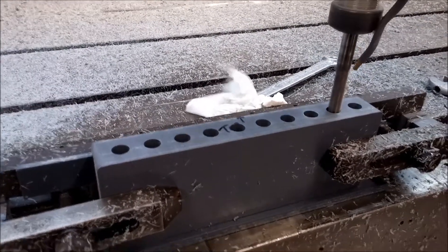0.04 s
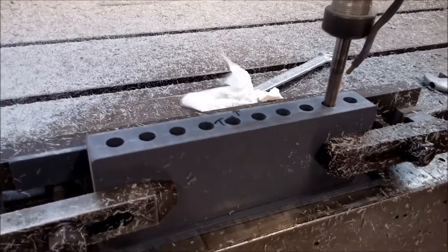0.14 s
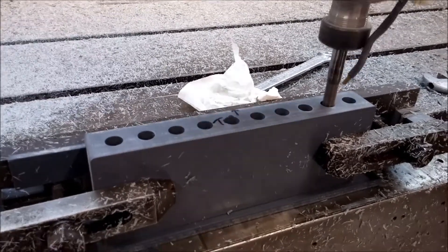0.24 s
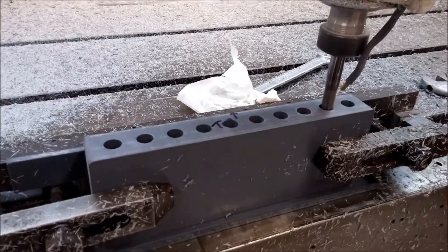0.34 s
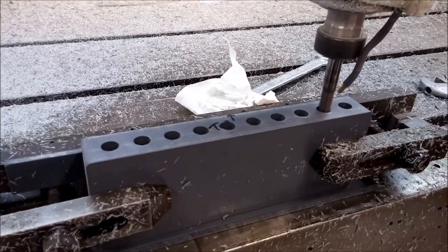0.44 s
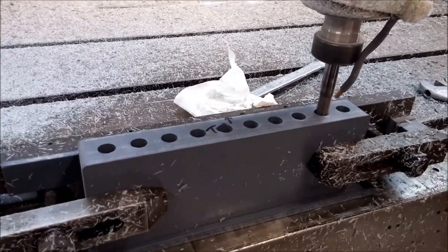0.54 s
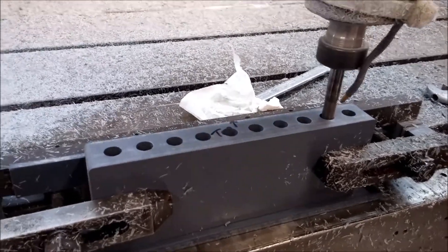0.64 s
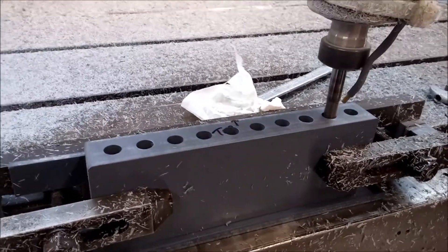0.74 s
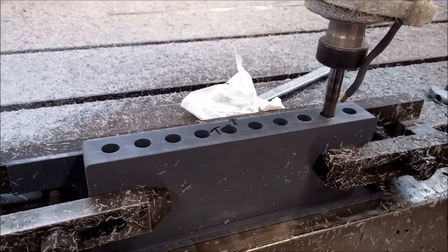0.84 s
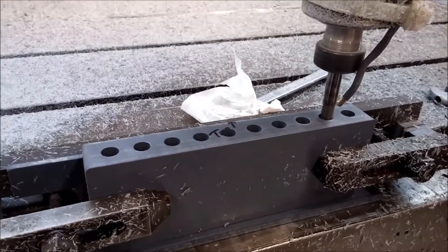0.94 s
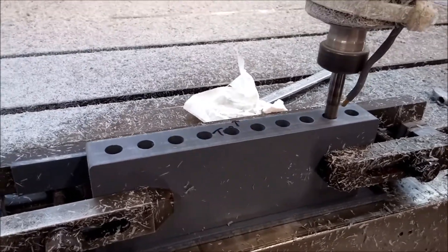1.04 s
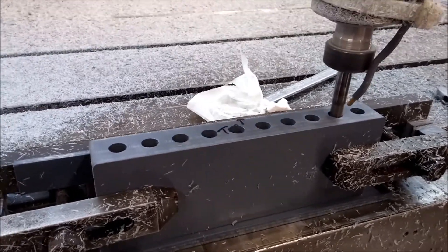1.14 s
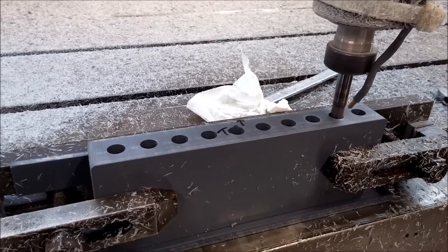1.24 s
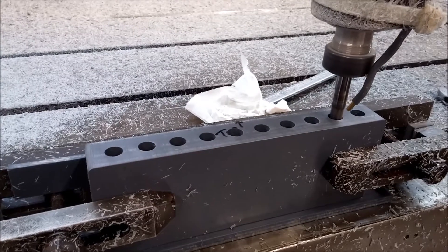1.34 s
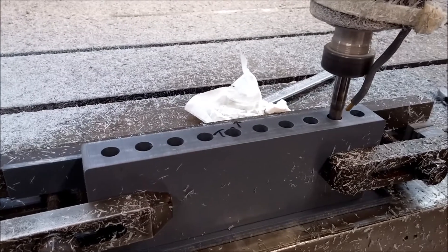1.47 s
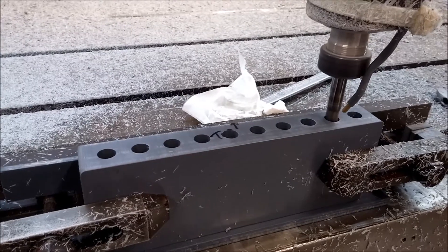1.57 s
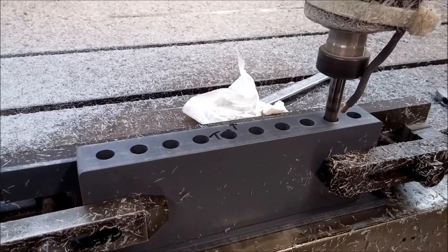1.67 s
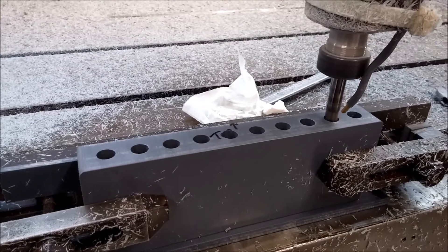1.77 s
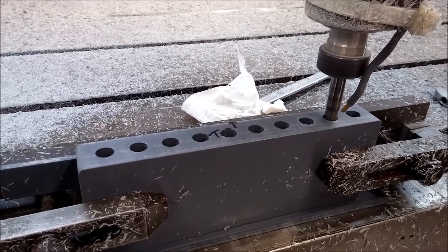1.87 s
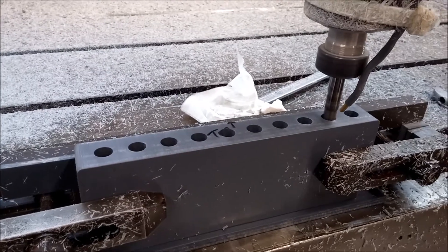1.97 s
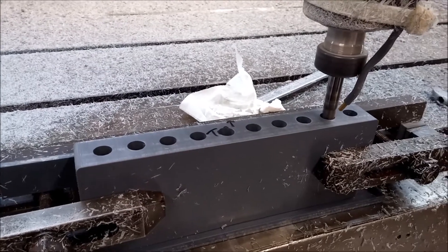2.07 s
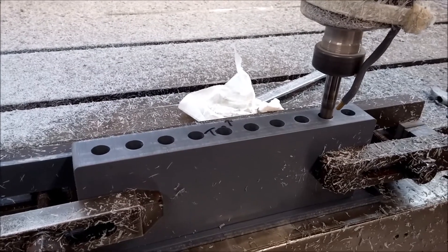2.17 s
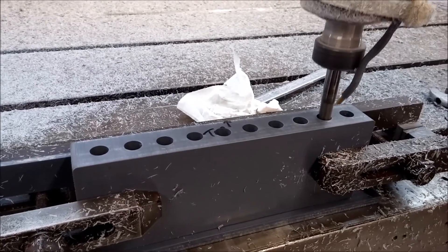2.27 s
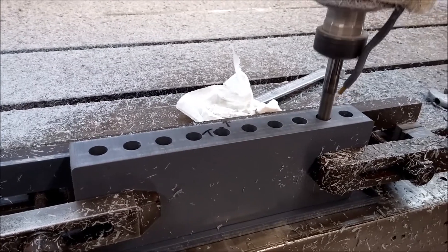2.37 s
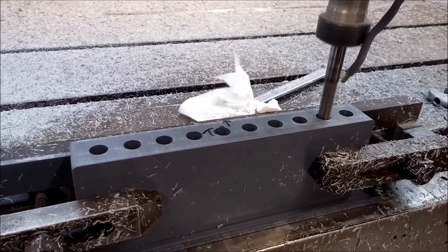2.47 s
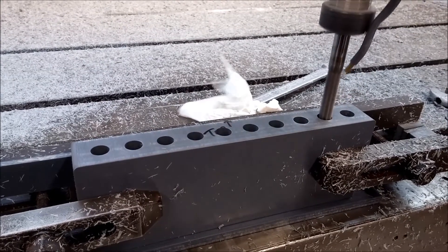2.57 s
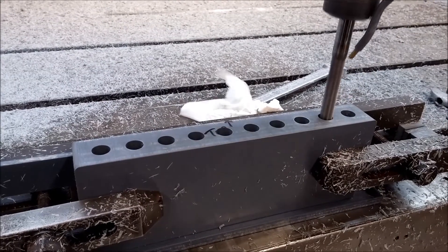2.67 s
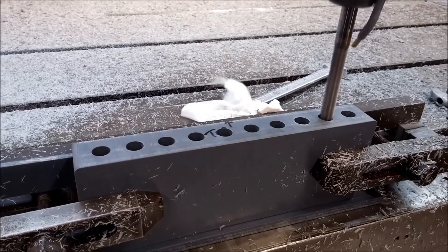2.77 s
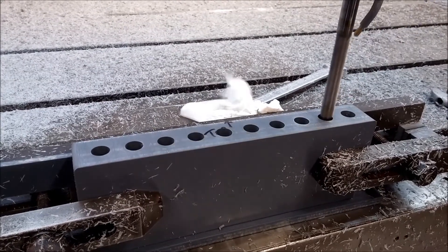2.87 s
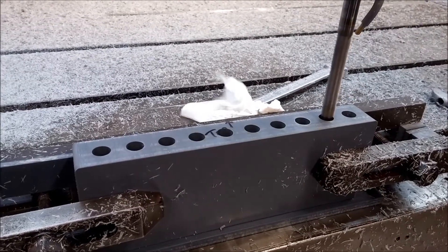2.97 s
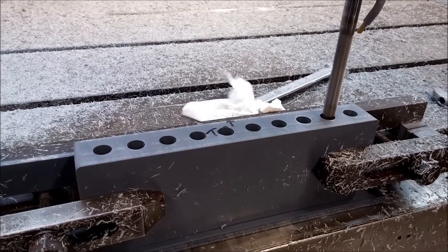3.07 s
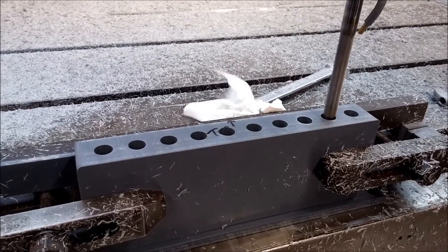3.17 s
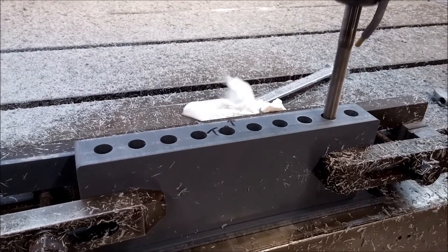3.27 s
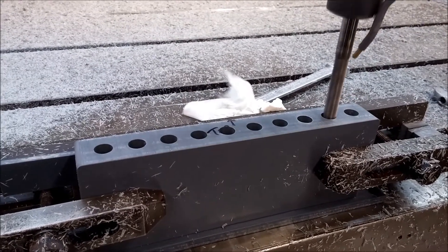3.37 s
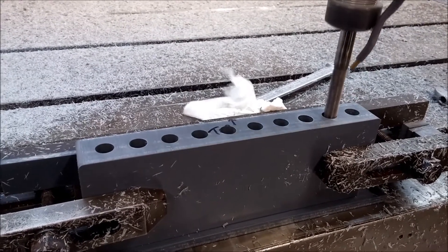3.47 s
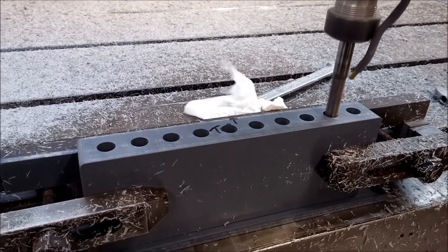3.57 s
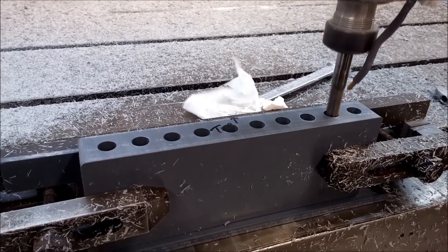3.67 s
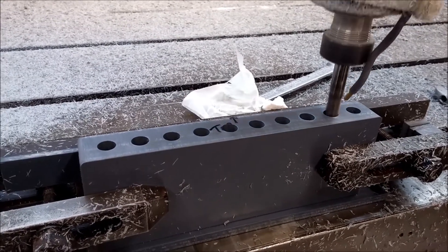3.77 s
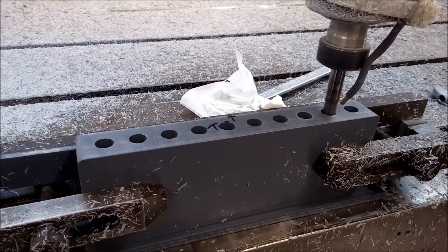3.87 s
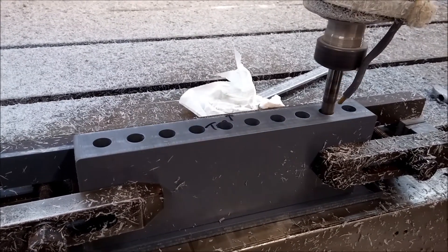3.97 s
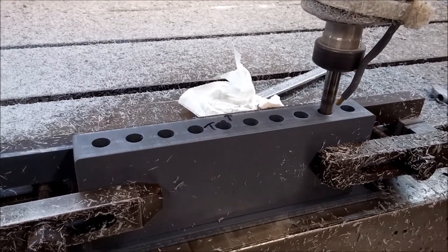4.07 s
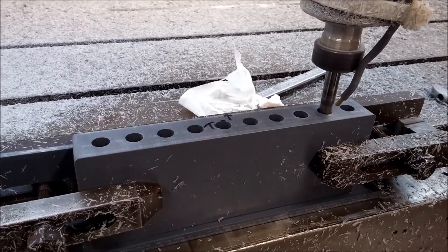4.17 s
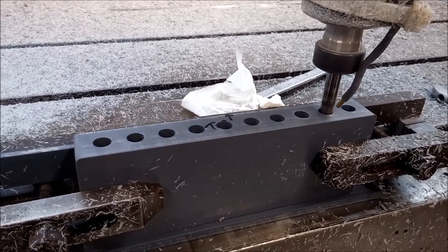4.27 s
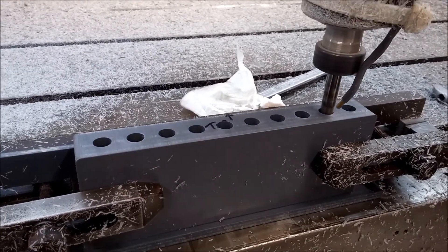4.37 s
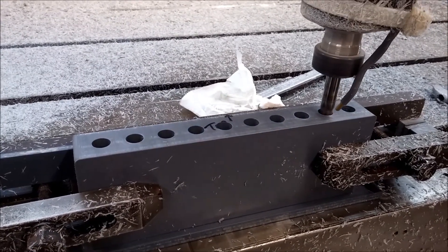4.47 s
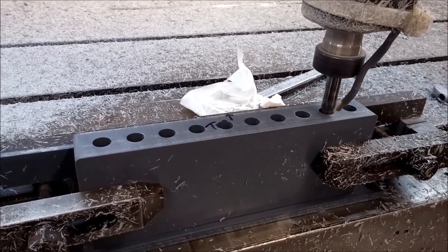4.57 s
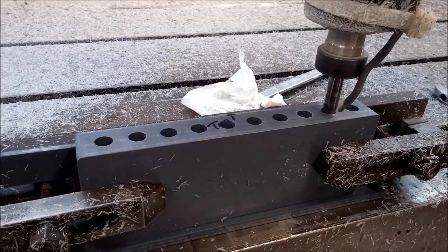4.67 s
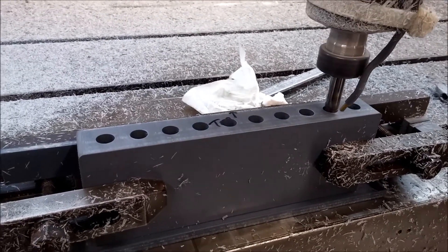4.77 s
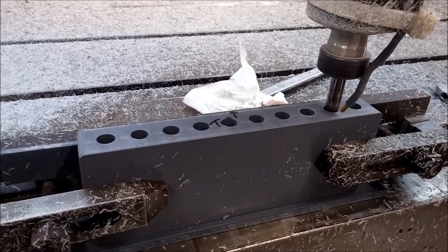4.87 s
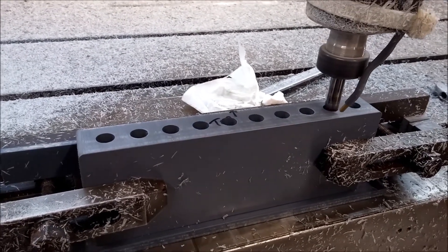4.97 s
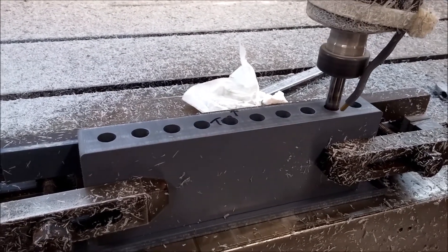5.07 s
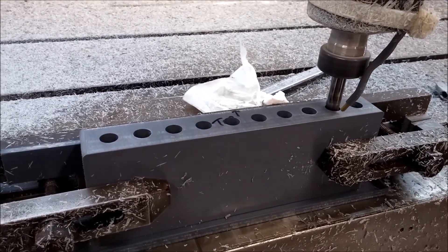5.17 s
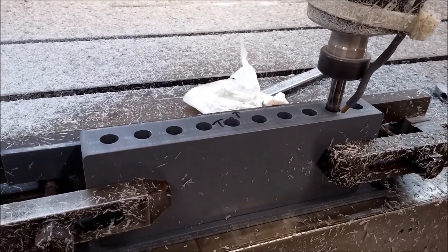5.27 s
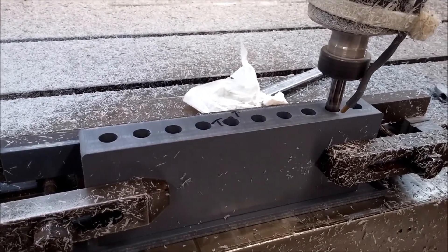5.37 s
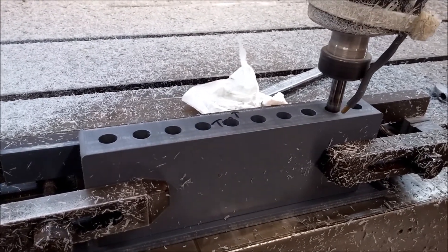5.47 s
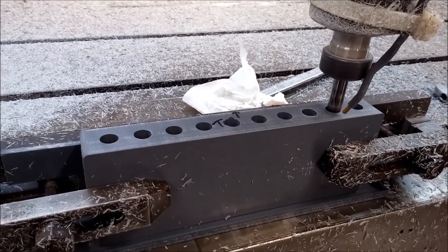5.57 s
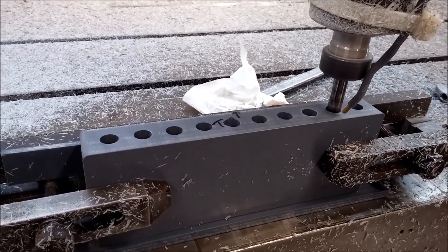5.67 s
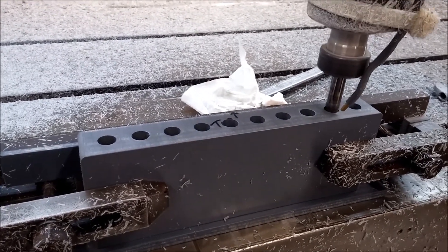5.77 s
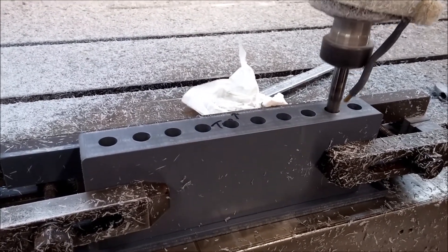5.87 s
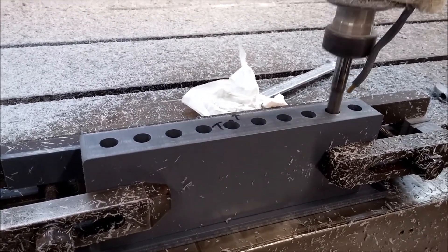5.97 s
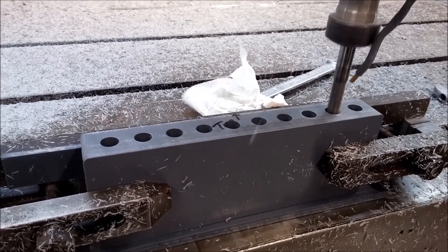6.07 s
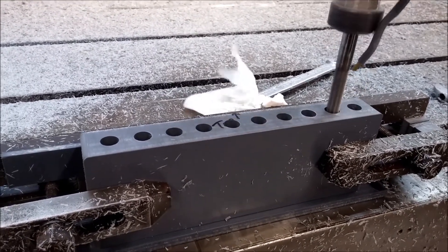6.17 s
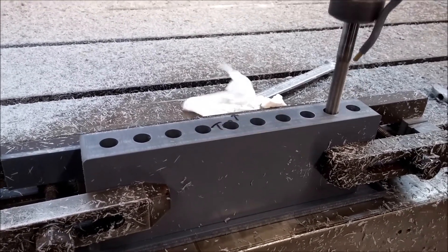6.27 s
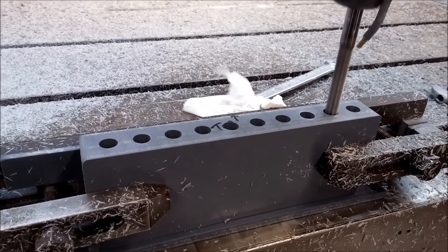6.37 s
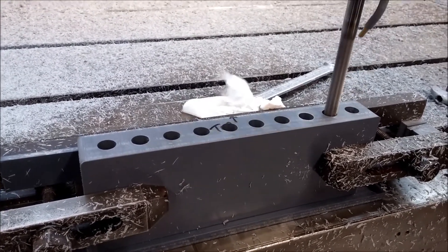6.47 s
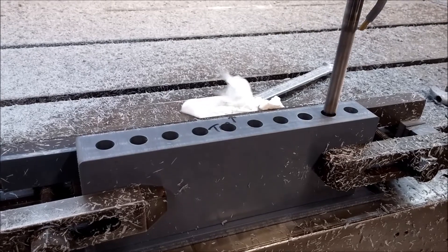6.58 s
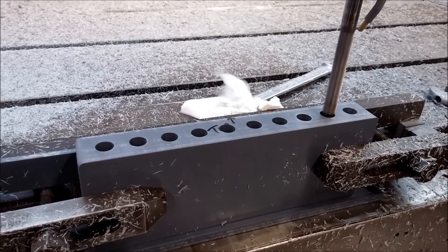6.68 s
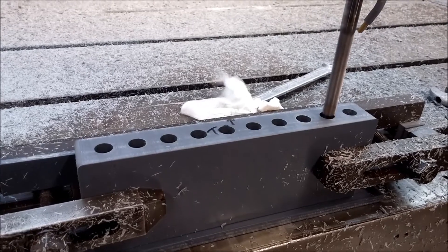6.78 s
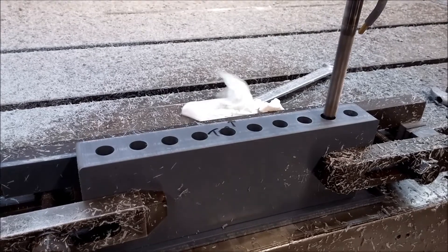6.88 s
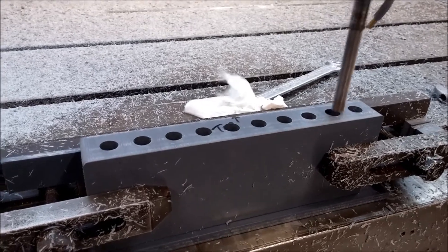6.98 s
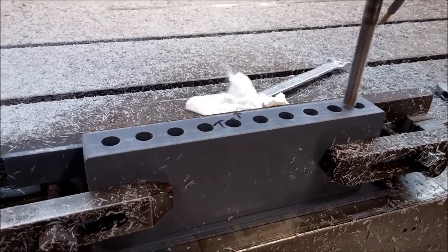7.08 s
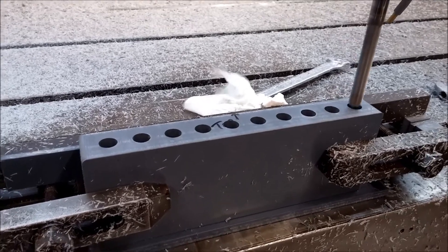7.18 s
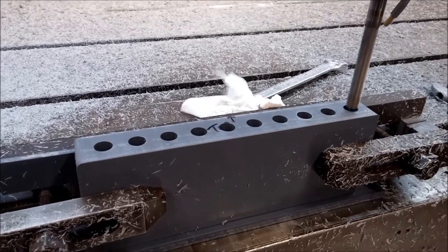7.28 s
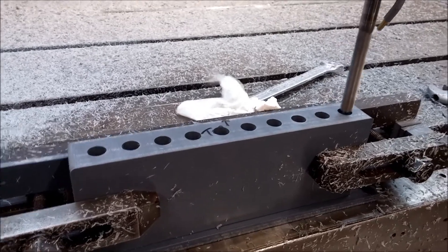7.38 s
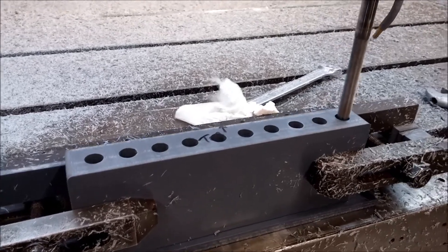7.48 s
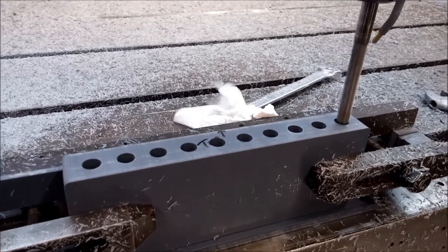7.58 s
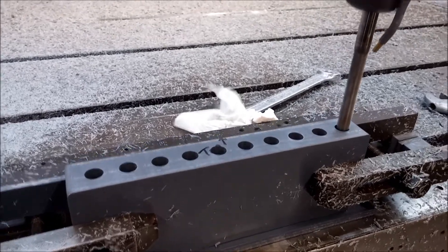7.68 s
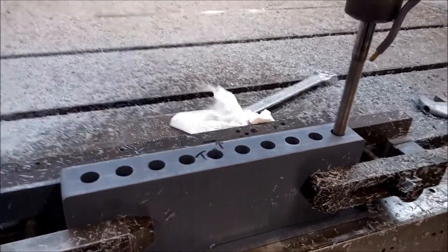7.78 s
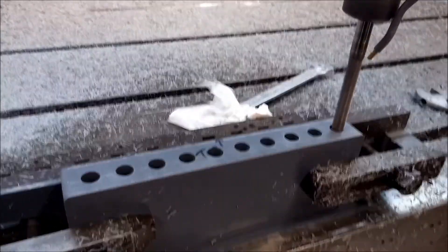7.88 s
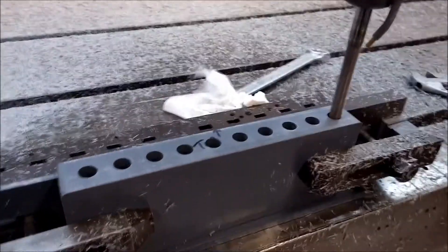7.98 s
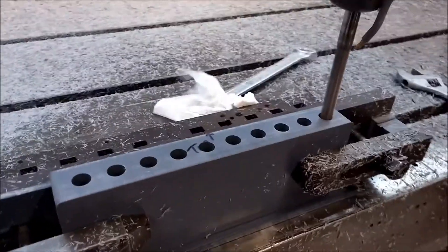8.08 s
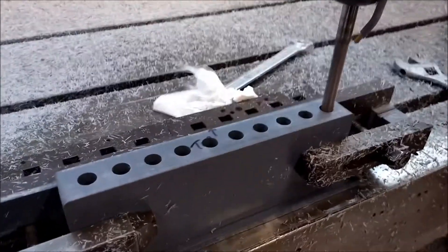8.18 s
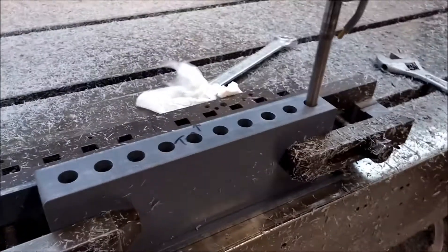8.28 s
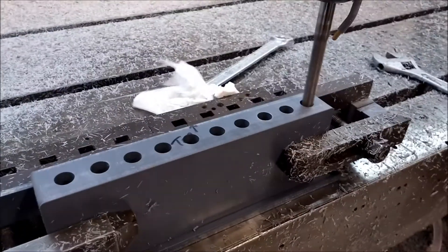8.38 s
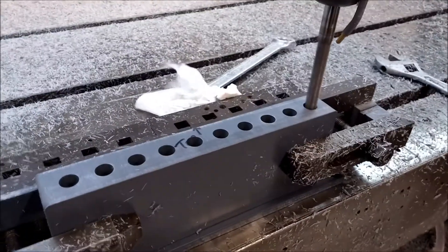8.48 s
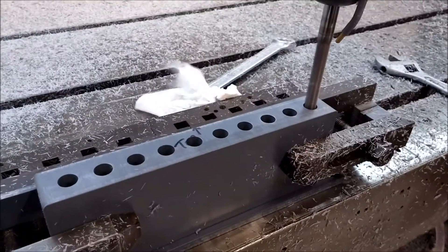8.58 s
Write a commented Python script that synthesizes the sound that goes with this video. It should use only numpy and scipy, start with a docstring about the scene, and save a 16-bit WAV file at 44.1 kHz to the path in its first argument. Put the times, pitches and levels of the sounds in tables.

```python
"""A loud hiss of air and coolant mist, joined by a whistle, as a mill drills a plastic block in pecks.
The hiss is turbulence where the jet strikes the drill and the rim of the deep hole. The jet also blows
the hole as a stopped pipe, whose note is now breathy, now clean. Drops and chips spit out in short
pressure pulses as the drill goes in. The spindle hums underneath, all heard close up in a workshop."""
import sys
import numpy as np
from scipy import signal
from scipy.fft import rfft, irfft, next_fast_len
from scipy.io import wavfile

SR = 44100
rng = np.random.default_rng(int(sys.argv[2]) if len(sys.argv) > 2 else 0)


def unload_wav(signal):
    """Save mono or channel-first audio to the path in sys.argv[1] as 16-bit WAV at rate SR, clipped to [-1, 1]."""
    wavfile.write(
        sys.argv[1],
        SR,
        np.round(np.clip(np.atleast_2d(signal).T, -1, 1) * 32767).astype(np.int16),
    )


N = 380123
TIME = np.arange(N) / SR
FREQS = np.maximum(np.arange(N // 2 + 1) * SR / N, 1)

# Jet spectra with the drill down and up: f/Hz, relative level/dB
DOWN_SPECTRUM = [(40, -42), (100, -27), (220, -0.5), (500, 3), (1400, 5.5), (1950, 8), (2700, 1), (4300, 3),
                 (6500, 5.5), (8000, 4), (10500, 6), (12000, -8.5), (16000, -15)]
UP_SPECTRUM = [(40, -41), (100, -42), (300, -9), (720, -2.5), (1000, 5), (1300, 0), (2000, 2.5),
               (2900, 4.5), (4800, 3), (7000, 4), (8600, 5), (11000, 0.5), (12300, -5.5), (13600, -30),
               (16000, -23)]
# Resonances and dips round the chuck (drill down) and in the tool gap (up): f/Hz, width/Hz, gain/dB
CHUCK_RESONANCES = [(1640, 200, 1.5), (2760, 91, 4.5), (4540, 200, 0.5), (5800, 170, -2.5),
                    (6600, 210, 0.5), (8000, 200, 3.5), (7800, 300, -2), (8330, 150, 3.5)]
GAP_RESONANCES = [(1128, 174, 7), (1550, 125, 9), (1727, 160, 6.5), (2040, 86, 5.5), (2285, 56, 6),
                  (2970, 130, -1.5), (3270, 37, 9.5), (3280, 90, -3), (3620, 70, -2), (3740, 70, 3.5),
                  (3850, 70, -2), (4400, 61, 3), (4970, 70, -3), (4930, 80, 2), (5390, 290, 4.5),
                  (6040, 140, -1), (6530, 140, 6), (7400, 370, 8), (7600, 250, -2), (8480, 300, 4),
                  (8800, 250, -1), (9840, 300, -2), (10770, 500, 5.5)]
# Low shelf of the free jet, changing as the microphone moves about: t/s, gain/dB
JET_BODY = [(0, -0.5), (3.3, 0.5), (6.8, -2), (7.15, 3.5), (7.5, 4), (7.8, 3), (8.1, -0.5), (8.4, -3),
            (8.62, -12)]

def jet(jet_db, lift, free_lift=0.88, shelf_hz=1500):
    """Turbulent noise, coloured by cavity resonances that change as the drill lifts out of the hole."""
    clear = np.clip(lift / free_lift, 0, 1)
    body_db, = in_time(JET_BODY)
    down = from_db(jet_db + 3) * np.sqrt(1 - clear) * hiss(DOWN_SPECTRUM, CHUCK_RESONANCES)
    free = hiss(UP_SPECTRUM, GAP_RESONANCES)
    free += (from_db(body_db) - 1) * filtered(free, shelf_hz, "low", order=1)
    up = from_db(jet_db + 5.5) * np.sqrt(clear) * free
    return (down + up) * from_db(0.67 * drift(21))


# Spectrum of the rim hiss: f/Hz, relative level/dB
RIM_SPECTRUM = [(1000, -41), (4000, -17), (6000, -12), (8000, 5), (10200, 8), (11600, 4), (12700, 6),
                (13600, 6.5), (14500, 4), (15200, 16), (15700, 7), (16000, 6.5)]
# Treble that stays in the jet away from the rim: t/s, relative level/dB
JET_TREBLE = [(0, -15), (3.5, -16), (5.3, -18), (6.1, -14), (7.0, -9), (7.6, -7), (8.62, -12)]

def rim_hiss(jet_db, lift, rim_lift=0.4, rim_reach=0.26):
    """Edge noise and atomisation: the jet hisses brightly as it grazes the rim or tears up coolant."""
    treble_db, = in_time(JET_TREBLE)
    grazing = from_db(jet_db + 7) * bell(lift - rim_lift, rim_reach)
    treble = from_db(jet_db + treble_db + 4.5)
    spray = from_db(2.6) * sputter(release_s=0.24)
    gain = np.sqrt(grazing ** 2 + treble ** 2 + spray ** 2)
    return gain * from_db(0.57 * drift(25)) * hiss(RIM_SPECTRUM)


# Fundamental of the hole, sharper the harder it is blown: t/s, f/Hz
FUNDAMENTAL = [(0, 1785), (.55, 1834), (1.45, 1822), (1.8, 1802), (2.5, 1804), (2.75, 1822), (3.0, 1793),
               (3.25, 1765), (3.7, 1775), (4.0, 1822), (4.2, 1810), (4.5, 1818), (4.8, 1826), (5.45, 1840),
               (6.0, 1840), (6.45, 1818), (6.95, 1772), (8.62, 1790)]
# Harmonics of the clean tone: harmonic number, level/dB re the fundamental
HARMONICS = [(2, -33), (3, -16)]
# Blasts in which the whistle catches: start t/s, end t/s, final level/dB, growth/(dB/s)
WHISTLE_BLASTS = [(4.724, 5.165, -23.5, 5), (5.204, 5.264, -18, 42), (5.427, 5.482, -26.5, -28),
                  (5.607, 5.782, -13, 47), (5.963, 5.988, -24, -2), (6.174, 6.277, -20.5, -15),
                  (6.52, 6.726, -25, 14)]
# Spells in which a lower tone beats with the note: centre t/s, length/s, beat f/Hz, amplitude ratio
BEAT_SPELLS = [(1.953, .45, 29, 0.33), (4.864, 0.33, 39, .85), (5.099, 0.24, 15.7, .6),
               (6.218, .18, 26.7, 0.77), (6.681, 0.2, 31, .4)]

def whistle(lift, clean_hz=1797.5, clean_range_hz=7.1, blast_flat_hz=9.2, breath_flat_hz=12):
    """Stopped-pipe resonance: blown harder, the fundamental grows sharper, louder and cleaner."""
    hz, = in_time(FUNDAMENTAL)
    share = mouth_share(lift)
    clean = 0.899 * share / (1 + np.exp((clean_hz - hz) / clean_range_hz))
    stall = held(5.28, 6.11, 0.014, 0.014)   # at the bottom of the hole the note sinks and flutters
    flutter_db = 0.5 * (1 + stall) * np.clip(drift(25), -2, 1.5)
    blowing_db = -24.5 + 0.06 * (hz - 1833)
    steady = from_db(blowing_db - 5.5 * (1 - share) - 11 * stall + flutter_db)
    blasts = 0
    for start, end, db, growth in WHISTLE_BLASTS:
        swell_db = db + growth * (np.clip(TIME, start, end) - end)
        blasts += from_db(swell_db) * held(start, end, attack_s=0.011, release_s=0.012)
    wander_hz = 8 * (1.2 - clean) * drift(18.15)
    phase = phase_of(hz - blast_flat_hz * blasts / blasts.max() + wander_hz)
    lower = sum(ratio * bell(TIME - s, length) * np.exp(-2j * np.pi * beat_hz * (TIME - s))
                for s, length, beat_hz, ratio in BEAT_SPELLS)
    tone = np.imag((1 + lower) * np.exp(1j * phase)) * np.sqrt(2 / (1 + np.abs(lower) ** 2))
    tone += sum(from_db(db) * np.sqrt(2) * np.sin(k * phase) for k, db in HARMONICS)
    breath = resonance(phase - 2 * np.pi * breath_flat_hz * TIME, width_hz=38)
    return np.hypot(steady * np.sqrt(clean), blasts) * tone + steady * np.sqrt(1 - clean) * breath


# Second mode of the stopped pipe: t/s, f/Hz, relative level/dB
SECOND_MODE = [(0, 5390, -7), (.5, 5400, -8), (1.1, 5272, -7), (1.5, 5410, -10), (2.4, 5530, -6.5),
               (4.4, 5460, -8.5), (5.3, 5525, -2.5), (6.1, 5520, -3), (6.4, 5490, -6), (8.62, 5450, -39)]
# Its other upper resonances: ratio to the fundamental, width/Hz, relative level/dB
PIPE_MODES = [(2.003, 50, -24), (4.93, 260, -5.5), (5.09, 312, -4.5), (5.27, 300, -7), (5.47, 550, -11),
              (7.07, 350, -20)]

def upper_modes(jet_db, lift):
    """Forced resonance: turbulence at the mouth drives the hole's broad upper modes, mostly odd ones."""
    hz, = in_time(FUNDAMENTAL)
    second_hz, second_db = in_time(SECOND_MODE)
    second = from_db(second_db) * resonance(phase_of(second_hz), width_hz=240)
    others = sum(from_db(db) * resonance(phase_of(k * hz), width) for k, width, db in PIPE_MODES)
    return from_db(jet_db + 4.5) * mouth_share(lift) * (second + others)


def mouth_share(lift, miss_lift=0.86, miss_range=0.061):
    """Jet-pipe coupling: the share of the jet that meets the mouth falls as the nozzle rises."""
    return 1 / (1 + np.exp((lift - miss_lift) / miss_range))


# Edge tones: f/Hz, fall per unit lift/Hz, width/Hz, reach in lift, level/dB re the jet
RIM_TONES = [(9400, 7200, 420, 0.24, 5.5), (6170, 300, 1060, 0.15, 2.5)]

def edge_tones(jet_db, lift, loudest_lift=0.38):
    """A jet oscillates against an edge: the pitch rises as the nozzle nears the rim, falls as it leaves."""
    past = lift - loudest_lift
    return sum(from_db(jet_db + db) * bell(past, reach) * resonance(phase_of(hz - fall * past), width)
               for hz, fall, width, reach, db in RIM_TONES)


# Passing squeals: centre t/s, length/s, f/Hz, width/Hz, level/dB
SQUEAL_BANDS = [(.84, 0.49, 5240, 70, -24.5), (1.05, .71, 4400, 200, -32.5), (1.077, 0.65, 13550, 350, -27),
                (6.504, 0.063, 6260, 90.5, -22), (6.57, 0.045, 5630, 50, -23)]

def squeals():
    """Narrow-band noise is heard as tones of steady pitch that swell and fade."""
    return sum(from_db(db) * bell(TIME - s, length) * resonance(phase_of(hz), width)
               for s, length, hz, width, db in SQUEAL_BANDS)


# The loudest spits: t/s, relative level/dB
LOUD_SPITS = [(0.59, -2), (.637, -4), (0.6564, -2), (0.6753, 4), (0.7128, -2), (.8127, -1), (0.8276, 0.5),
              (0.8365, -2), (0.9353, -6), (1.0228, -2), (1.0873, 3), (1.1376, -3), (1.206, -6), (1.2743, 2),
              (1.3856, 0.5), (1.514, 1), (1.542, 1.5), (1.6619, 4), (1.6792, 2.5), (1.9087, -4),
              (2.5698, 3), (2.6443, 1), (2.6768, 0), (4.0597, -3), (4.1276, -4), (4.1428, -1), (4.1869, 0),
              (4.2922, -5), (4.3816, 0), (4.411, 1), (4.42, -5), (4.6406, -4.5), (6.2444, -1.5),
              (6.3039, 0), (6.3372, 0)]

def spits(jet_db, drops_per_s=470, spread_db=3, collapse_hz=650):
    """Impulsive sources: each bursting drop is a pressure step that collapses within a millisecond."""
    wet = np.hypot(sputter(release_s=0.13), from_db(jet_db - 24))   # a few drops always fly
    sizes = from_db(spread_db * np.minimum(rng.exponential(1, N), 3.3)) * rng.choice([-1, 1], N)
    small = sizes * (rng.random(N) < drops_per_s / SR)
    large = np.zeros(N)
    for s, db in LOUD_SPITS:
        large[int(s * SR)] = rng.choice([-1, 1]) * from_db(db)
    decay = np.exp(-2 * np.pi * collapse_hz / SR)
    steps = signal.lfilter([1], [1, -decay], np.array([small, large]) + 1e-18)
    rounded = filtered(steps, 2900, "low", order=1)   # a drop takes a moment to burst
    small, large = filtered(rounded, 140, "high", order=2)   # a small source radiates little bass
    drops = from_db(1.5) * wet * rms_one(small) + from_db(0.8) * large
    return filtered(drops, 86, "high", order=2)


# Spells of sputtering coolant: start t/s, end t/s, relative level/dB
SPUTTER_SPELLS = [(0.576, 1.46, -26), (1.586, 1.696, -28.5), (1.877, 2.052, -30.5), (2.55, 2.74, -29),
                  (4.026, 4.461, -26.5), (6.287, 6.35, -25.5), (6.47, 6.5, -27)]

def sputter(release_s, attack_s=0.062):
    """Envelope of the coolant thrown from the hole, with exponential rise and decay."""
    spells = [from_db(db) * held(start, end, attack_s, release_s) for start, end, db in SPUTTER_SPELLS]
    return np.max(spells, axis=0)


def gust(at_s=6.42, length_s=0.13, db=-42):
    """Flow noise: a stray gust brushes the microphone as the drill comes out."""
    return from_db(db) * bell(TIME - at_s, length_s) * drift(70)


# Partials of the spindle: f/Hz, level/dB
SPINDLE_PARTIALS = [(208, -64.5), (417, -54), (626, -55)]

def spindle(waver_db=2):
    """Periodic rotation gives a faint motor hum, its partials wavering in level and phase."""
    hum = 0
    for hz, db in SPINDLE_PARTIALS:
        gain = from_db(db + waver_db * np.clip(drift(3), -2, 1))
        hum += gain * np.sqrt(2) * np.sin(phase_of(hz) + drift(3))
    return hum


def reflections(x, near_t60_s=0.045, near_db=-13, shop_t60_s=0.45, shop_db=-22):
    """Reverberation: table, clamps and column scatter short echoes; the workshop adds a faint tail."""
    t = TIME[:SR // 2]
    near = rng.standard_normal(len(t)) * from_db(-60 * t / near_t60_s) * (t > 0.003)
    shop = rng.standard_normal(len(t)) * from_db(-60 * t / shop_t60_s) * (t > 0.015)
    echoes = (from_db(near_db) * rms_one(near) + from_db(shop_db) * rms_one(shop)) / np.sqrt(len(t))
    return x + signal.fftconvolve(x, echoes)[:N]


def rumble(db=-79, corner_hz=45):
    """Ambient noise: the low-frequency floor of the workshop."""
    return from_db(db) * noise((FREQS > 15) / np.sqrt(1 + (FREQS / corner_hz) ** 4))


def hiss(spectrum, peaks=()):
    """Broadband noise with Lorentzian peaks and dips; rms 1."""
    hz, db = np.transpose(spectrum)
    colour_db = np.interp(np.log(FREQS), np.log(hz), db)
    for centre, width, gain_db in peaks:
        colour_db += gain_db / (1 + (2 * (FREQS - centre) / width) ** 2)
    return noise(from_db(colour_db))


def resonance(phase, width_hz):
    """A randomly driven resonance: two slow noises modulate a carrier in quadrature; rms 1."""
    skirt = 1 / np.sqrt(1 + (2 * FREQS / width_hz) ** 2) / (1 + (FREQS / (4 * width_hz)) ** 2)
    return noise(skirt) * np.cos(phase) + noise(skirt) * np.sin(phase)


def noise(gain):
    """White noise shaped by a gain at each of FREQS; rms 1."""
    size = next_fast_len(N)
    gain = np.interp(np.arange(size // 2 + 1) * SR / size, FREQS, gain)
    return rms_one(irfft(rfft(rng.standard_normal(size)) * gain, size)[:N])


def drift(corner_hz):
    """Low-pass random fluctuation; rms 1."""
    return noise(1 / (1 + (FREQS / corner_hz) ** 2))


def filtered(x, hz, kind, order):
    """Butterworth low- or high-pass."""
    return signal.sosfilt(signal.butter(order, hz, kind, fs=SR, output="sos"), x + 1e-18)


def bell(distance, reach):
    """Gaussian swell, 1 at zero distance."""
    return np.exp(-2 * (distance / reach) ** 2)


def held(start, end, attack_s, release_s):
    """Exponential rise, 1 from start to end, exponential decay."""
    return np.exp(np.minimum(TIME - start, 0) / attack_s - np.maximum(TIME - end, 0) / release_s)


def phase_of(hz):
    """Phase is the time integral of frequency."""
    return 2 * np.pi * np.cumsum(np.broadcast_to(hz, N)) / SR


def in_time(rows):
    """Each column after t/s, interpolated at every sample."""
    s, *columns = np.transpose(rows)
    return [np.interp(TIME, s, column) for column in columns]


def from_db(db):
    """Level to amplitude ratio."""
    return 10 ** (np.asarray(db) / 20)


def rms_one(x):
    """Scale to unit power."""
    return x / np.sqrt(np.mean(np.abs(x) ** 2) + 1e-20)


# Pecking motion of drill and nozzle: t/s, lift (0 deep in the hole, 1 clear of it)
DRILL_LIFT = [(0, 1), (.27, 0.75), (.6, 0.29), (1.7, 0.057), (2.52, 0.092), (2.83, 0.38), (3.12, 0.73),
              (3.28, 1), (3.55, .94), (3.7, .78), (4.22, 0.061), (6.15, .03), (6.48, 0.4), (6.8, .74),
              (6.92, 0.87), (7.6, 0.91), (8.62, 0.81)]
# Strength of the jet on the tool, the reference for its sounds: t/s, level/dB
JET_LEVEL = [(0, -26.5), (.25, -24.7), (1.2, -24), (1.8, -26.5), (2.57, -26.5), (2.75, -24.5), (3.45, -26),
             (3.7, -24.5), (4.16, -23.5), (4.24, -25.5), (4.9, -27), (5.25, -31.5), (6.13, -29.5),
             (6.3, -21.5), (6.78, -21), (6.92, -23.5), (7.75, -24.5), (8.62, -20.3)]

def scene():
    """Superposition: all sources add at one microphone, alike in both channels."""
    jet_db, = in_time(JET_LEVEL)
    lift, = in_time(DRILL_LIFT)
    air = jet(jet_db, lift) + rim_hiss(jet_db, lift)
    air += upper_modes(jet_db, lift) + edge_tones(jet_db, lift) + squeals()
    drops = spits(jet_db)
    mono = reflections(air) + whistle(lift) + drops + gust() + spindle() + rumble()
    return np.array([mono, mono])


def record(dry):
    """Clipping and band limiting: peaks stop at full scale, then a steep low-pass cuts the top."""
    low_pass = signal.ellip(12, 0.1, 80, 15770, fs=SR, output="sos")
    return signal.sosfilt(low_pass, np.clip(dry, -1, 1))


dry = scene()
out = record(dry)
unload_wav(out)
```